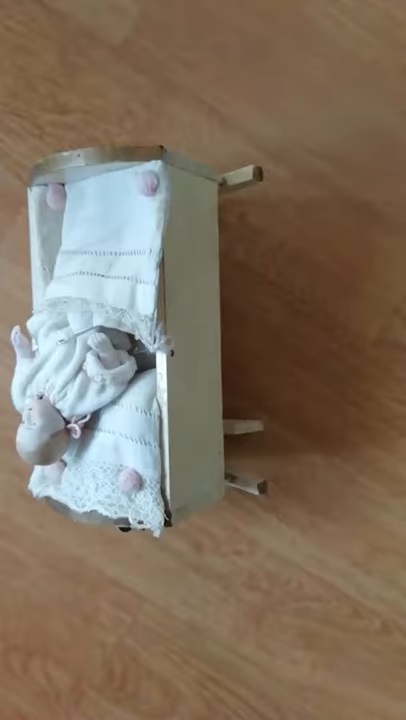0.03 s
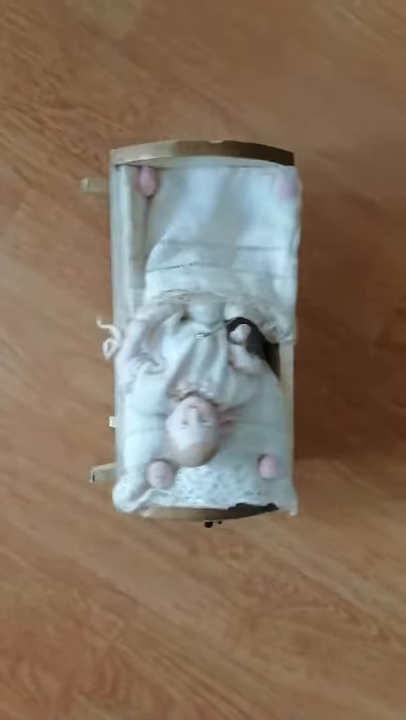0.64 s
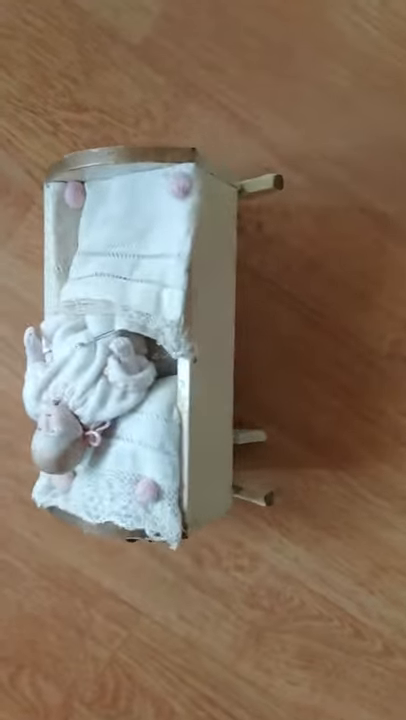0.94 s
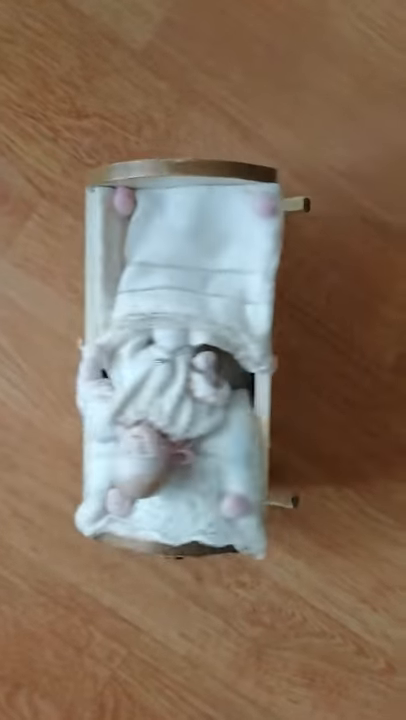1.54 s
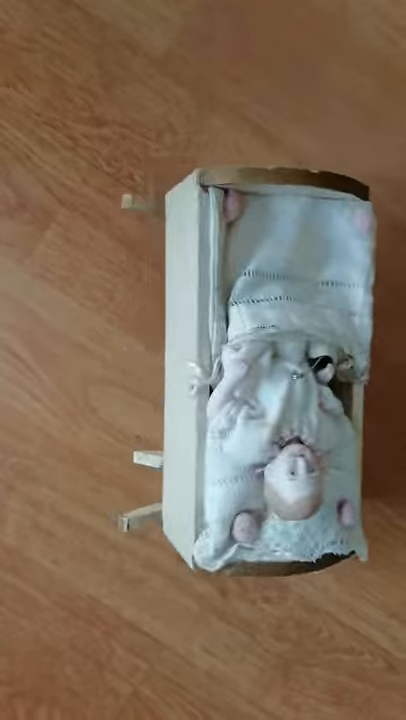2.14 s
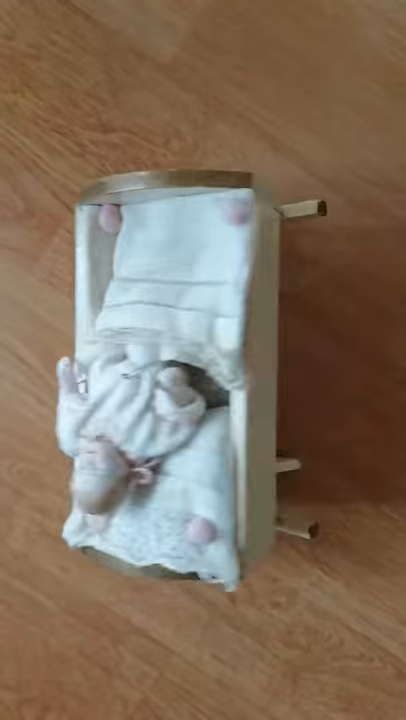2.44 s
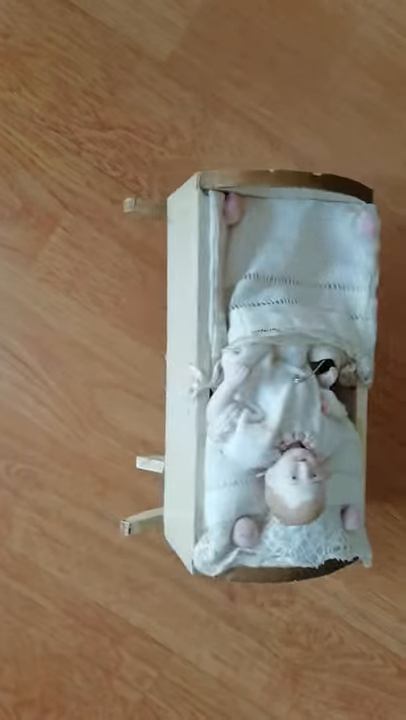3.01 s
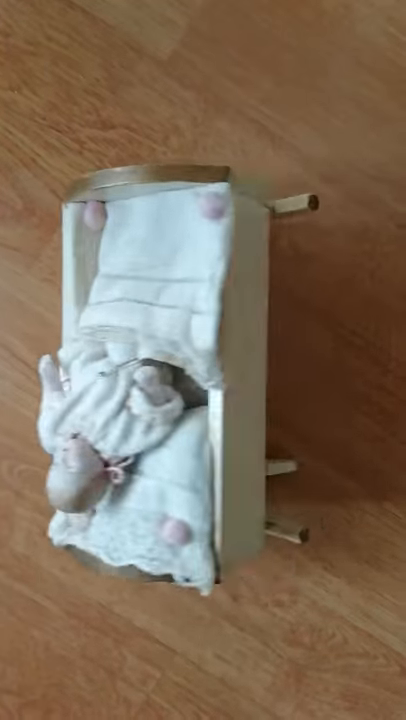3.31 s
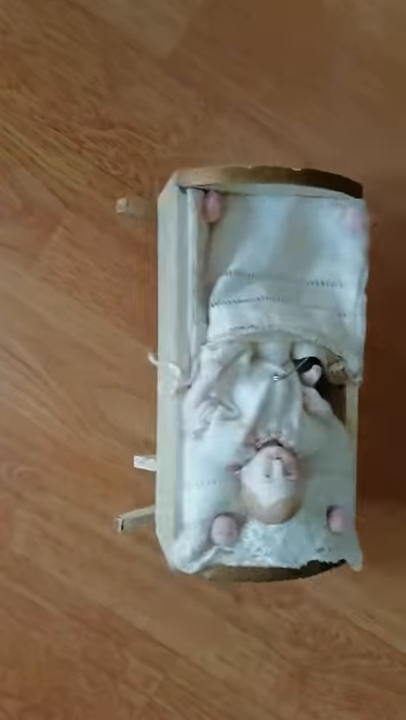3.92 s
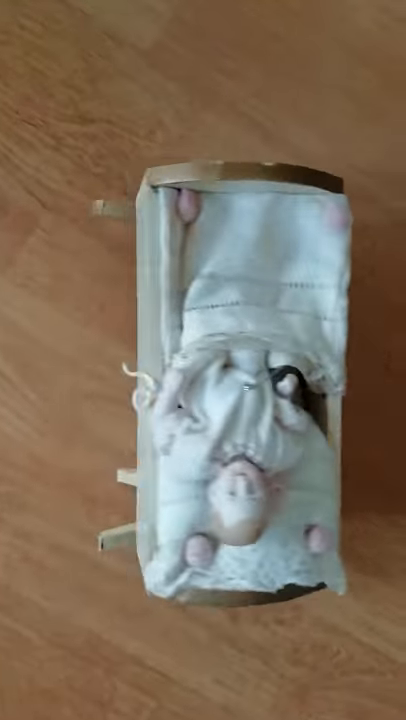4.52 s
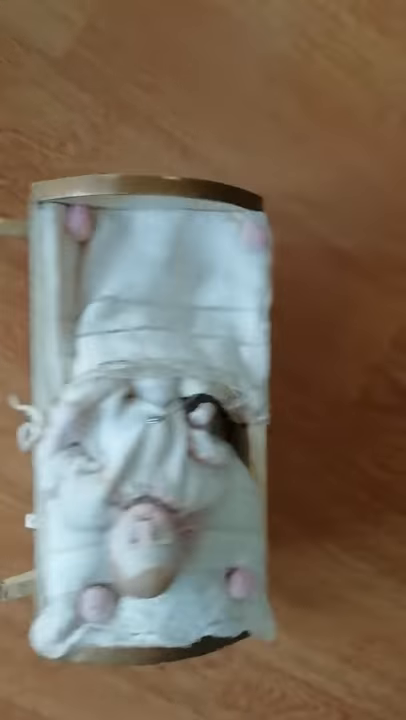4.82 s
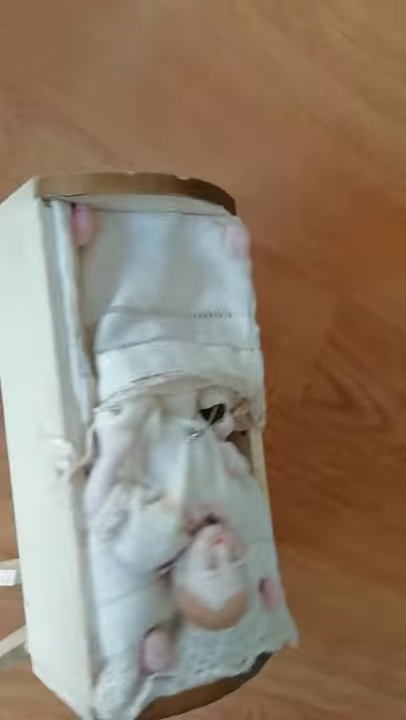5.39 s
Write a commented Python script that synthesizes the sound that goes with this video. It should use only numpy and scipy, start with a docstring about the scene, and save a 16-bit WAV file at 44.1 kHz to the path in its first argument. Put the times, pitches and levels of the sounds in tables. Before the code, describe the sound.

After a moment of silence, the microphone opens at about 0.4 seconds with a small thump on a quiet, bare room, where clockwork gears whirr and hum faintly. At 0.5 seconds a toy cradle rocking on a wooden floor gives its first sharp clack. Twelve more follow in a slightly lopsided tick-tock, the gaps alternating between about a third of a second and half a second, until the last at around 5.5 seconds. Each clack is a tight rattle of blows, a bright metal ring over a wooden knock, with a short echo from the walls. The clacks are by far the loudest sound and stay fairly even. Between them the rockers bump softly over the boards and the mechanism gives a few tiny ticks. The cradle squeaks very faintly near 1, 1.8 and 4.3 seconds, and a little more clearly at about 5.3 seconds.

```python
"""The microphone opens with a small thump on a quiet, bare room where clockwork gears whirr and hum.
A doll's cradle rocks on the wooden floor. Near the end of each swing a catch scuffs, then the works
strike home with a short rattle of blows: a bright metal ring over a wooden clack, echoed by the walls.
Between the clacks the rockers bump softly over the boards, and now and then the works tick
or the frame squeaks."""
import sys
import numpy as np
from scipy import signal
from scipy.fft import rfft, irfft
from scipy.io import wavfile

SR = 44100
rng = np.random.default_rng(int(sys.argv[2]) if len(sys.argv) > 2 else 0)


def generate_wav(signal):
    """Clip the signal to [-1, 1] and save it as 16-bit WAV at the path in sys.argv[1]."""
    frames = np.transpose(np.atleast_2d(signal))
    scaled = np.clip(frames, -1, 1) * 32767
    pcm = np.round(scaled).astype(np.int16)
    wavfile.write(sys.argv[1], SR, pcm)


N = 244755
TIME = np.arange(N) / SR
RING_TIME = TIME[:SR // 10]  # the tenth of a second that one contact is given to ring
SECOND_BLOW_S = 0.004  # how long after the first blow of a clack the second one lands

# The clacks that end the swings, right and left in turn. Each row: first blow in seconds, wait for the
# rebound in seconds, level in dB, boost of the wooden tones in dB, lead of the left ear in dB.
CLACK_STRIKES = [(0.4935, 0.0092, -11, -6.5, 1), (0.8339, .011, -13, -8, 0), (1.2999, 0.009, -13, -7.5, 4),
                 (1.6499, 0.014, -14, -9.5, 6), (2.1212, .011, -13, -13, 2.5), (2.475, 0.012, -14, -10, 3),
                 (2.941, 0.017, -14.5, -6.5, 1.5), (3.3031, 0.011, -14, -9, 2),
                 (3.7803, .0123, -13, -8.5, 1.5), (4.1491, 0.011, -13, -11, 1.5),
                 (4.6400, 0.012, -14.5, -8.5, 4), (4.9866, 0.011, -11.5, -8.5, 0.5),
                 (5.4509, .012, -14, -8, 2)]


def clacks(second_db=3.0, rebound_db=4.5, chatter_db=1.5, trail_s=0.0088, span_s=0.022):
    """The works strike twice and bounce back once, while loose parts chatter around the blows."""
    out = np.zeros((2, N))
    lead_s = 0.02  # room for the chatter ahead of the first blow
    since_blow = RING_TIME - lead_s
    for k, (first_s, rebound_s, level_db, wood_db, pan_db) in enumerate(CLACK_STRIKES):
        swings_left = k % 2
        # the chatter swells as the slack is taken up and dies after the rebound
        swell_s = 0.0045 if swings_left else 0.0031
        swell = np.exp(np.minimum(since_blow, 0) / swell_s)
        trail = np.exp(-np.maximum(since_blow - rebound_s, 0) / trail_s)
        contacts = swell * trail * random_taps(len(RING_TIME), per_s=2400)
        clack = from_db(chatter_db) * rattle(swings_left, wood_db + 6.5, contacts)
        for after_s, blow_db in ((0, 0), (SECOND_BLOW_S, second_db), (rebound_s, rebound_db)):
            add(clack, lead_s + after_s, from_db(blow_db) * blow(swings_left, wood_db))
        ear_gains = from_db(level_db + pan_db * np.array([[0.5], [-0.5]]))
        add(out, first_s - lead_s, unit_energy(clack) * np.sqrt(span_s * SR) * ear_gains)
    return out


def blow(swings_left, wood_db, wood_below_hz=4800, crack_db=-1.0, crack_t60=0.019, rise_s=0.00026):
    """One hard contact makes a crack of noise and sets all the toy's own tones ringing."""
    # The tones of the cradle and its works. Each row: pitch in Hz, level on a right swing in dB,
    # level on a left swing in dB, seconds to fade by 60 dB.
    toy_tones = [(136.5, -23, -28.5, 0.21), (273, -24.5, -23, .04), (765, -18.5, -24.5, 0.013),
                 (1011, -21.5, -30.5, 0.09), (1230, -14, -16.5, 0.037), (1341, -16, -24, 0.033),
                 (1500, -21, -23.5, 0.023), (1637, -12, -14.5, 0.022), (1690, -24, -18.5, 0.034),
                 (2157, -14, -24.5, 0.063), (2515, -12.5, -18.5, 0.026), (2821, -12.5, -15, 0.019),
                 (3217, -9.5, -19.5, 0.081), (3533, -10.5, -18.5, 0.084), (3890, -12.5, -12, 0.18),
                 (4260, -8, -14, 0.12), (4540, -10.5, -15, 0.013), (5378, -6, -22, 0.023),
                 (5820, -6.5, -15.5, 0.015), (6900, -17, -34, 0.013), (6770, -4, -34, .012),
                 (7100, -5, -26, 0.0053), (8200, -14.5, -12, .009), (8520, -8.5, -0.5, 0.0028),
                 (8479, -0.5, 3, .024), (9235, -2, -5, 0.0046), (10320, -18.5, -16, 0.036),
                 (12800, -18, -15.5, 0.0077)]
    # The colour of the crack. Each row: frequency in Hz, relative level in dB.
    crack_colour = [(40, -45), (150, -28.5), (500, -28), (1300, -13.5), (2500, -16.5), (4500, -9),
                    (6800, -6.5), (8500, 2.5), (10000, -19), (11500, -20), (15500, -27.5)]
    hz, right_db, left_db, t60 = np.transpose(toy_tones)
    level_db = (left_db if swings_left else right_db) + wood_db * (hz < wood_below_hz)
    strength = from_db(level_db) / np.sqrt(t60)  # short tones start louder to carry their energy
    # loose parts sit differently each time, which shifts their pitches; the high metal ring is steadier
    hz = hz * (1 + np.where(hz < 8200, 0.022, 0.006) * rng.standard_normal(len(hz)))
    # short waves reach the two sides of the microphone out of step
    spread_rad = np.minimum(hz / 2600, 1.35)
    phase = rng.uniform(0, 2 * np.pi, len(hz)) + spread_rad * rng.standard_normal((2, len(hz)))
    rings = np.exp(2j * np.pi * hz[:, None] * RING_TIME) * fade(RING_TIME, t60[:, None])
    body = ((strength * np.exp(1j * phase)) @ rings).real  # adds up the tones for each ear
    crack = noise(crack_colour, len(RING_TIME)) * fade(RING_TIME, crack_t60)
    sound = unit_energy(body) + from_db(crack_db) * unit_energy(crack)
    return unit_energy(sound * rise(RING_TIME, rise_s))


def rattle(swings_left, wood_db, contacts, parts=3):
    """Small contacts are shared among a few loose parts, each with a ring of its own."""
    part_hit = np.arange(len(contacts)) % parts
    rings = [signal.fftconvolve(blow(swings_left, wood_db), [contacts * (part_hit == k)], axes=1)
             for k in range(parts)]
    return unit_energy(sum(rings))


def scuffs_and_ticks():
    """The catch scuffs just before every clack, and the works give a few short, stray ticks."""
    # The touches of the catch on a right and on a left swing. Each row: seconds ahead of the clack,
    # level in dB, boost of the wooden tones in dB.
    catch_right = [(.006, -38.5, 7)]
    catch_left = [(.036, -51, 2), (.014, -40, 21)]
    # The stray ticks. Each row: start in seconds, level in dB, boost of the wooden tones in dB.
    ticks = [(.786, -59, -5), (1.174, -56.5, 0), (1.589, -56.5, 1), (2.857, -62.5, 2), (4.573, -57.5, 4),
             (5.268, -56.5, 9)]
    out = np.zeros((2, N))
    for k, (clack_s, *_) in enumerate(CLACK_STRIKES):
        for ahead_s, level_db, wood_db in catch_left if k % 2 else catch_right:
            add(out, clack_s - ahead_s, touch(level_db, wood_db, settle_t60=0.11, first_tap_db=-8.5))
    for start_s, level_db, wood_db in ticks:
        add(out, start_s, touch(level_db, wood_db, settle_t60=0.07, first_tap_db=2.5))
    return out


def touch(level_db, wood_db, settle_t60, first_tap_db, span_s=0.028, left_boost_db=2.5):
    """A part lands with a light tap and goes on trembling for a moment."""
    contacts = random_taps(len(RING_TIME), per_s=2000)
    trembling = unit_energy(contacts * fade(RING_TIME, settle_t60) * rise(RING_TIME, rise_s=0.0013))
    force = trembling + from_db(first_tap_db) * (RING_TIME == 0)
    ring = blow(swings_left=True, wood_db=wood_db, wood_below_hz=3000)
    sound = signal.fftconvolve(ring, [force], axes=1)
    ear_gains = from_db([[level_db + left_boost_db], [level_db]])
    return unit_energy(sound) * np.sqrt(span_s * SR) * ear_gains


def floor_bumps(board_hz=(200, 300), pitch_spread=0.19, upper_db=-4.0, thud_db=6.0, roll_db=-12.5):
    """Each soft bump shakes a floorboard for a few cycles, and the rocker rumbles on after it."""
    # The rumble of a rolling rocker. Each row: frequency in Hz, relative level in dB.
    roll_colour = [(50, -17), (130, -6.5), (270, 5), (400, -9.5), (600, -20), (1100, -18.5), (2200, -29.5),
                   (6000, -45.5)]
    out = np.zeros((2, N))
    for start_s, level_db in bump_events():
        hz = np.exp(pitch_spread * rng.standard_normal(2)) * board_hz
        lower, upper = np.sin(2 * np.pi * hz[:, None] * RING_TIME)
        thud = from_db(thud_db) * (lower + from_db(upper_db) * upper) * fade(RING_TIME, t60=0.022)
        roll = from_db(roll_db) * noise(roll_colour, len(RING_TIME)) * fade(RING_TIME, t60=0.2)
        add(out, start_s, from_db(level_db) * (thud + roll) * rise(RING_TIME, rise_s=0.0027))
    return out


def bump_events(jitter_s=0.001, scatter_db=1.5, growth_db_per_s=0.85, right_db=-41, left_db=-37.5):
    """Times and levels of the bumps: uneven spots, slowly growing firmer, and a thud under each clack."""
    # The uneven spots that the rockers cross on every trip to and fro. Each row: seconds from the
    # clack of the left swing, relative level in dB.
    uneven_spots = [(-.112, -47), (-.042, -43.5), (-.011, -38.5), (.038, -47.5), (.073, -43), (.196, -41),
                    (.238, -39.5), (.269, -39), (.295, -39), (.333, -46), (.42, -43.5)]
    clack_times = np.array(CLACK_STRIKES)[:, 0]
    spots = np.array([(left_s + offset_s, db + growth_db_per_s * (left_s - clack_times.mean()))
                      for left_s in clack_times[1::2] for offset_s, db in uneven_spots])
    spots += rng.standard_normal(spots.shape) * [jitter_s, scatter_db]
    thuds = [(s + SECOND_BLOW_S, left_db if k % 2 else right_db) for k, s in enumerate(clack_times)]
    return list(spots) + thuds


def frame_squeaks(slips_per_s=1500, attack_s=0.019, release_s=0.011):
    """Two surfaces rub in tiny slips, which make the frame ring at a few pitches."""
    # The pitches at which the frame rings. Each row: pitch in Hz, width in Hz, relative level in dB.
    frame_tones = [(530, 540, -2), (1470, 650, -5.5), (2720, 140, 8.5), (4260, 720, -8), (5700, 110, 2.5),
                   (7550, 340, 0.5), (8400, 640, -11), (12800, 800, -23)]
    # The squeaks. Each row: start in seconds, length in seconds, level in dB.
    squeaks = [(0.966, 0.09, -55.5), (1.759, 0.053, -54), (4.292, 0.035, -54), (5.333, 0.112, -45)]
    slips = rng.standard_normal((2, N)) * (rng.random(N) < slips_per_s / SR)
    sound = sum(from_db(db) * resonate(slips, hz, width_hz) for hz, width_hz, db in frame_tones)
    pressure = np.zeros(N)
    for start_s, length_s, level_db in squeaks:
        press = np.clip((TIME - start_s) / attack_s, 0, 1)
        let_go = np.exp(-np.maximum(TIME - start_s - length_s, 0) / release_s)
        pressure += from_db(level_db) * press * let_go
    return unit_energy(sound) * np.sqrt(N) * pressure


def room(directions, level_db=-13.0):
    """The sound sent in each direction meets walls of its own and comes back as echoes."""
    echoed = sum(signal.fftconvolve([sent], echoes(), axes=1)[:, :N] for sent in directions)
    return from_db(level_db) * echoed / np.sqrt(len(directions))


def echoes(first_wall_s=0.00064, build_s=0.032):
    """The room's answer to one click: a wash of echoes builds up, then dies band by band."""
    # What the walls send back. Each row: frequency in Hz, relative level in dB.
    echo_colour = [(100, -2.5), (500, -5.5), (1000, 0.5), (3000, 2), (6000, 1.5), (8500, -2.5),
                   (11000, -4.5), (12700, 1), (15000, -22.5)]
    # How long the room rings. Each row: frequency in Hz, seconds to fade by 60 dB.
    echo_lengths = [(150, 0.37), (1000, 0.38), (4000, 0.36), (8500, 0.34), (14000, 0.32)]
    t = TIME[:SR // 2]
    hz = np.arange(len(t) // 2 + 1) * SR / len(t)
    spectrum = rfft(noise(echo_colour, len(t)))
    edges_hz = np.geomspace(20, SR / 2, num=15)
    tail = np.zeros((2, len(t)))
    for low, high in zip(edges_hz, edges_hz[1:]):
        band = irfft(spectrum * ((hz >= low) & (hz < high)), len(t))
        tail += band * fade(t, at_hz(echo_lengths, np.sqrt(low * high)))
    return unit_energy(tail * rise(np.maximum(t - first_wall_s, 0), build_s))


def gear_whirr(level_db=-61.0, flutter_db=3.0, flutter_hz=70):
    """The gears run unevenly, so their soft noise flutters in level."""
    # The whirr over the quiet of the room. Each row: frequency in Hz, relative level in dB.
    whirr_colour = [(25, -10), (70, -2.5), (140, 2.5), (280, -10.5), (520, -19.5), (1100, -19), (1375, -22),
                    (1700, -22), (4000, -24), (7000, -26), (8600, -17.5), (10500, -31.5), (15500, -39.5)]
    flutter_times = np.arange(N // 100) / flutter_hz
    flutter = np.interp(TIME, flutter_times, rng.standard_normal(len(flutter_times)))
    return noise(whirr_colour, N) * from_db(level_db + flutter_db * flutter)


def gear_hum(pitch_hz=1380, width_hz=35, level_db=-67.0):
    """The running gears keep their case humming at one pitch."""
    hum = resonate(rng.standard_normal((2, N)), pitch_hz, width_hz)
    return from_db(level_db) * np.sqrt(N) * unit_energy(hum)


def noise(colour, size, alike_below_hz=260):
    """Stereo noise with the given colour and an average power of one, alike in both ears in the bass."""
    hz = np.arange(size // 2 + 1) * SR / size
    middle, side = rfft(rng.standard_normal((2, size)))
    side = side * hz ** 2 / (hz ** 2 + alike_below_hz ** 2)
    spectrum = (middle + side * [[1], [-1]]) * from_db(at_hz(colour, hz))
    return unit_energy(irfft(spectrum, size)) * np.sqrt(size)


def random_taps(size, per_s):
    """Tiny pushes of random strength at random moments."""
    return rng.standard_normal(size) * (rng.random(size) < per_s / SR)


def resonate(sound, hz, width_hz):
    """Keep the part of a sound that lies near one pitch."""
    return signal.lfilter(*signal.iirpeak(hz, hz / width_hz, fs=SR), sound)


def rise(t, rise_s):
    """A level that climbs from zero and settles at one."""
    return 1 - np.exp(-t / rise_s)


def fade(t, t60):
    """A level that falls by 60 dB in t60 seconds."""
    return from_db(-60 * t / t60)


def from_db(db):
    """Turn decibels into a number to multiply by."""
    return 10 ** (np.asarray(db) / 20)


def at_hz(table, hz):
    """Read between the rows of a frequency table, giving every octave equal room."""
    known_hz, values = np.transpose(table)
    return np.interp(np.log(np.maximum(hz, 1)), np.log(known_hz), values)


def unit_energy(sound):
    """Scale a sound to a total energy of two: on average one for each ear."""
    return sound / np.sqrt(np.sum(sound ** 2) / 2 + 1e-20)


def add(out, start_s, sound):
    """Mix a sound in at the given time."""
    start = round(start_s * SR)
    out[:, start:start + sound.shape[-1]] += sound[..., :N - start]


def scene():
    """The toy in its room; its clacks sound different upwards and sideways."""
    small_sounds = scuffs_and_ticks() + floor_bumps()
    upwards = clacks() + small_sounds
    sideways = clacks() + small_sounds  # heard only by way of the walls
    return upwards + room([*upwards, *sideways]) + gear_whirr() + gear_hum() + frame_squeaks()


def record(dry, mic_on_s=0.398, thump_db=-32.0, settle_s=0.11, cutoff_hz=15700):
    """The microphone opens with a jump that drains away; peaks are rounded and the top treble is cut."""
    since_on = np.maximum(TIME - mic_on_s, 0)
    thump = from_db(thump_db) * np.exp(-since_on / settle_s)
    live = (dry - thump) * (since_on > 0)
    low_pass = signal.ellip(10, 0.1, 70, cutoff_hz, fs=SR, output="sos")
    return signal.sosfilt(low_pass, np.tanh(live))


dry = scene()
out = record(dry)
generate_wav(out)
```